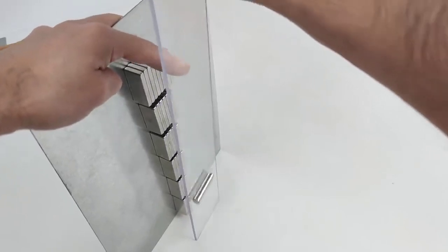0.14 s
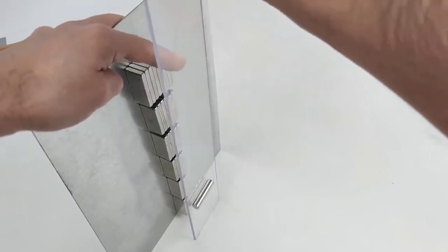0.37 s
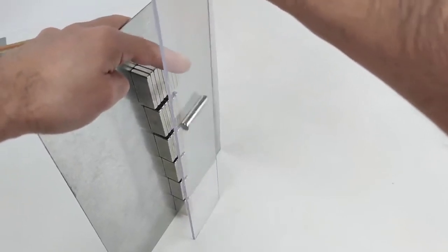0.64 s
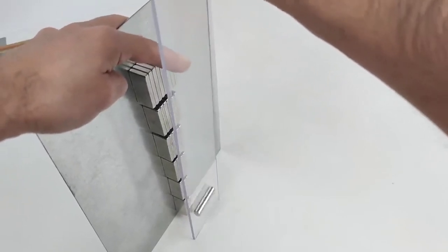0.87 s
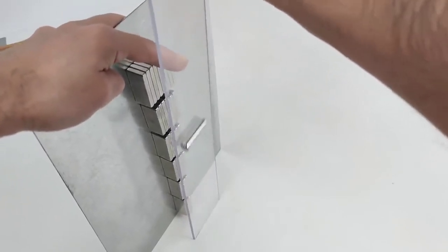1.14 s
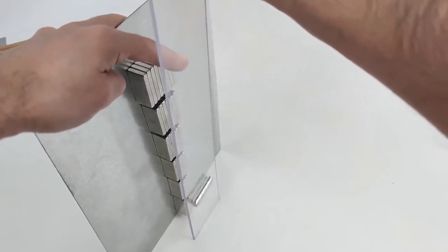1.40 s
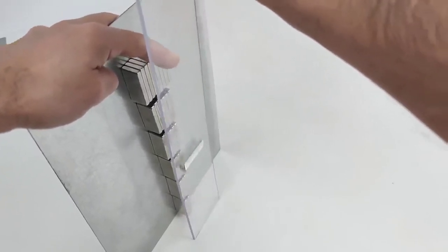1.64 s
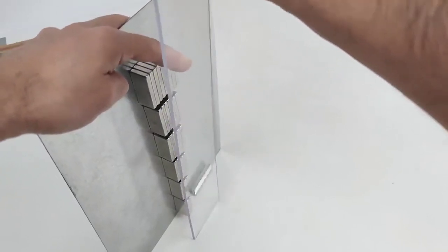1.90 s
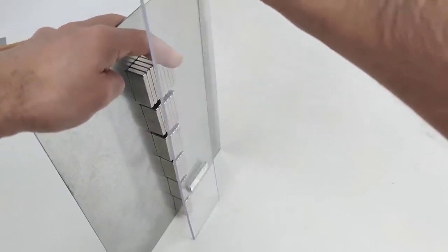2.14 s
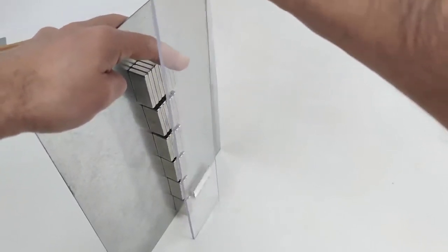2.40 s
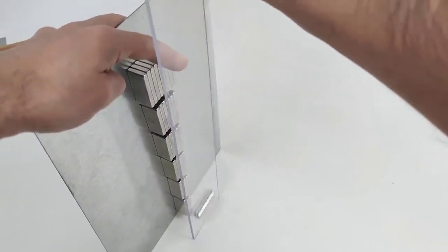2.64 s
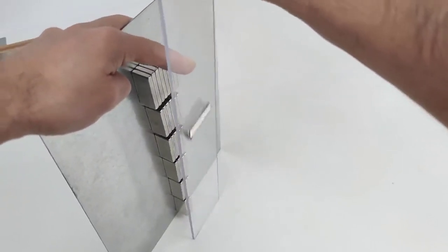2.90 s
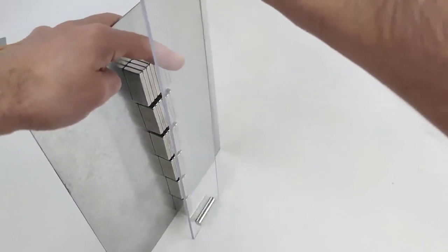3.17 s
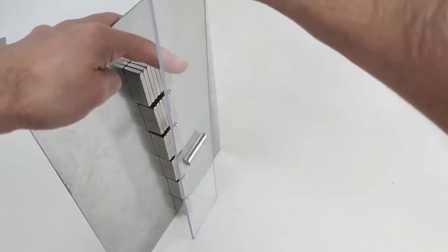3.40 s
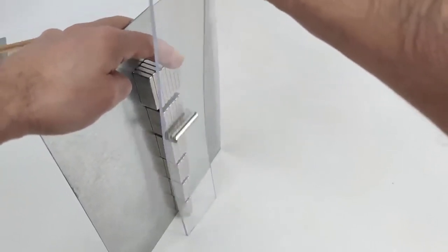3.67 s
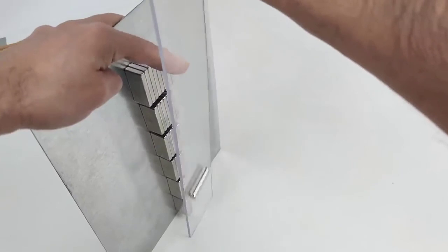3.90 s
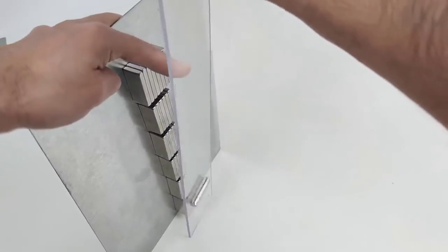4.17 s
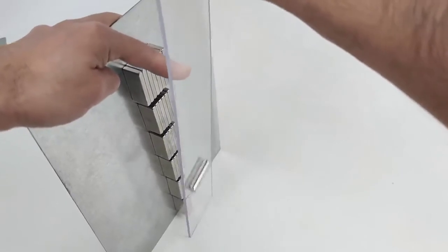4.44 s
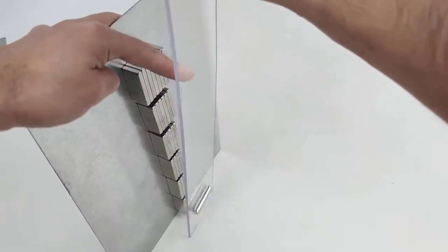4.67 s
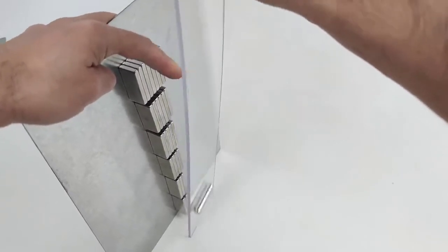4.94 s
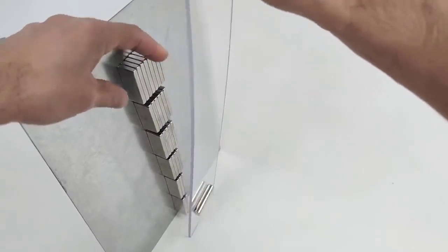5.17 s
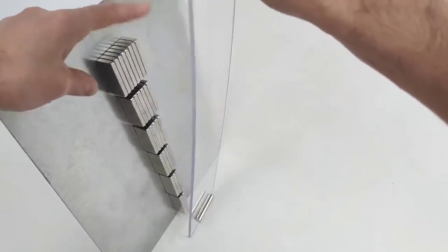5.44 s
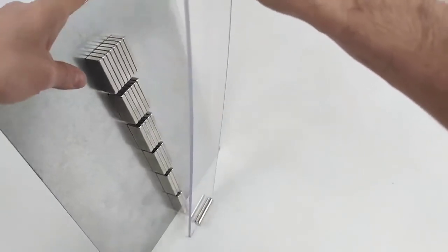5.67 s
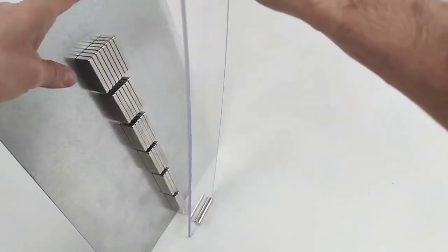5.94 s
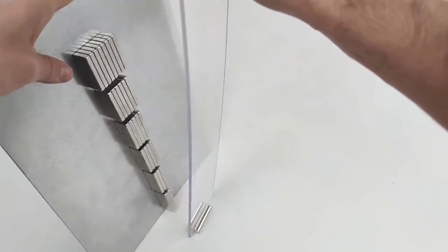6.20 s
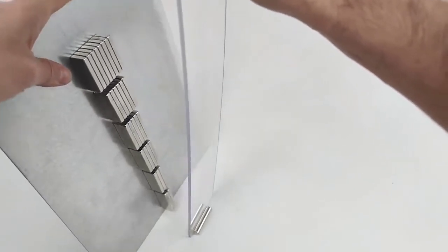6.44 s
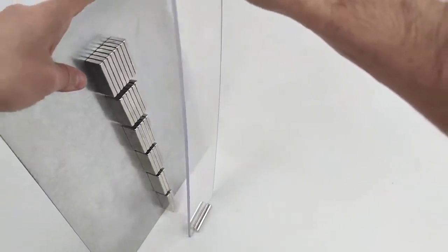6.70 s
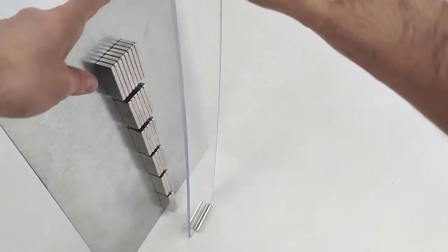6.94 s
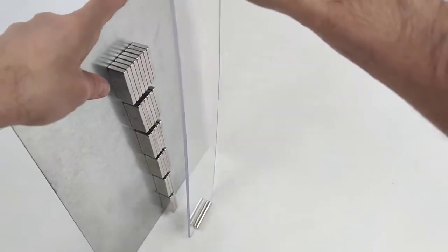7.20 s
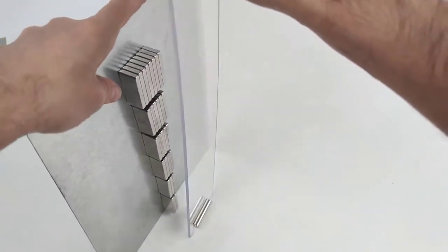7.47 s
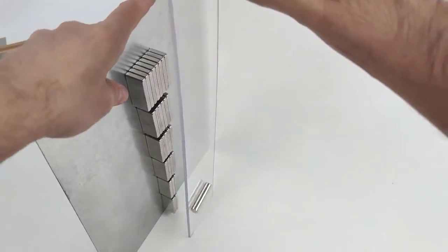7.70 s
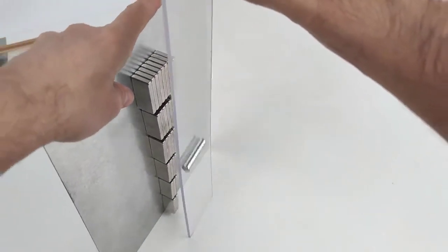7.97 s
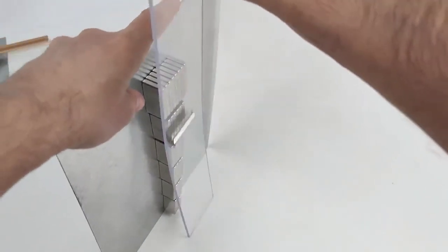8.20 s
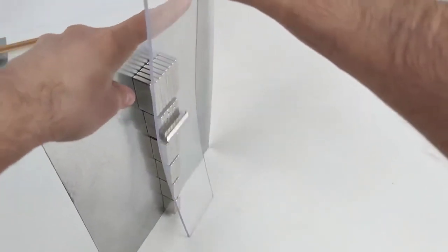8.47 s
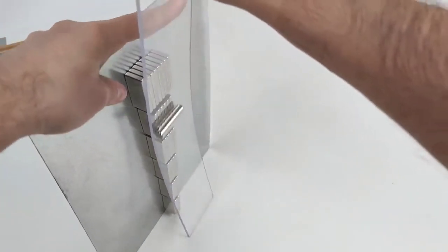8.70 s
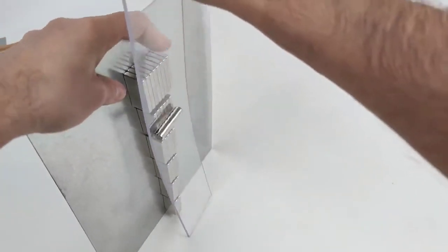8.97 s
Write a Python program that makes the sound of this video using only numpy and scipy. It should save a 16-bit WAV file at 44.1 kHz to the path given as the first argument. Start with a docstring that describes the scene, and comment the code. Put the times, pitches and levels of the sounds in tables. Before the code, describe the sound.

Close stereo in a quiet room with a short, soft tail and faint hiss and rumble. From 0 to 3.4 s a small steel cylinder rolls up and down thin plastic, about three or four rasping strokes a second, each swelling then dulling at the turn, grainy and bright around 2 kHz with a wavering ring and crisp clicks, densest and brightest around 2.2-3.1 s. At 3.6 s comes one very loud sharp crack with a low ring. Strokes resume 3.9-5.4 s with harder knocks; at 5.05 s a strong knock booms the steel plate. From 5.6 to 6.2 s weaker, duller scuffs and knocks end in a hollow low groan. It is nearly silent 6.5-7.5 s. Faint falling scrapes begin at 7.6 s, clicks gather around 8 s, a loud clack with low boom hits at 8.17 s, a thud follows at 8.27, then soft rapid fluttering, about 29 pulses a second, fades until 9.1 s.

```python
"""Steel cylinder rolling on a plastic sheet

A small steel cylinder, held by magnets on a steel plate, rolls up and down a clear plastic sheet.
Rolling sends tiny random contacts through the sheet's many modes, heard as rasping strokes.
Knocks are short trains of contacts that ring the sheet; the shaken plate booms in low modes.
At the end the cylinder rocks quickly in place. A quiet room is heard through two close microphone ports.
"""
import sys
import numpy as np
from scipy import signal
from scipy.fft import rfft, irfft, next_fast_len
from scipy.io import wavfile

SR = 44100
rng = np.random.default_rng(int(sys.argv[2]) if len(sys.argv) > 2 else 0)


def wav_out(sig):
    """Save sig, one row per channel (or a flat mono array), as 16-bit PCM at SR to the path in sys.argv[1]."""
    wavfile.write(sys.argv[1], SR, np.round(np.clip(np.atleast_2d(sig).T, -1, 1) * 32767).astype(np.int16))


def decibels_to_gain(level_db):
    """Convert a level in decibels to a linear amplitude gain (20 dB per decade)."""
    exponent = np.asarray(level_db, float) / 20
    return 10 ** exponent


N = 401310   # length in samples

# Levels and decay times in the tables are starting values; the functions add gains and damping.
# Pan is left minus right.

# rolling strokes up or down the sheet:
# (middle [s], length [s], rasp at full speed [dB], treble over rasp [dB])
STROKES = [(0.1, 0.39, -48.5, -8), (0.561, 0.27, -37.5, 1.5), (0.821, 0.29, -35.5, -2),
           (1.125, 0.26, -34, -4.5), (1.394, 0.25, -32, -3.5), (1.686, 0.24, -33.5, 0.5),
           (1.924, 0.3, -35.5, 1.5), (2.227, 0.28, -37, 7.5), (2.443, 0.34, -35.5, 6.5),
           (2.749, 0.27, -30.5, -4.5), (3.031, 0.3, -34, 3.5), (3.364, 0.31, -38.5, -1),
           (3.974, 0.34, -40, -0.5), (4.24, 0.27, -35.5, -6.5), (4.543, 0.33, -40.5, 6),
           (4.72, 0.2, -33.5, -2), (5.026, 0.28, -32.5, 2), (5.37, 0.21, -38.5, -2),
           (5.589, 0.085, -40, -21), (5.686, 0.19, -43, -26), (5.857, 0.12, -44, -26),
           (5.942, 0.15, -45, -31), (6.156, 0.19, -41.5, -2.5), (6.423, 0.032, -54, -23)]
TURN_DROP_DB, TURN_SHARPNESS = 19, 3.18   # the rasp sinks this far at both ends, where the cylinder turns
BITE_PER_DB, FIZZ_DB, FIZZ_PER_BITE = 2.66, -10, 1   # slower rolling is duller; top octave over rasp
STROKE_SHAKE_DB, SHAKE_PER_DB, STROKE_REGION_HZ = -56, 0.64, 896   # rolling shakes the plate a little

# hard knocks leave a dying rattle and shake the plate:
# (time [s], rattle [dB], shake [dB], region shaken [Hz], fade [dB per s])
JOLTS = [(0.0, -50, -57.5, 494, 167), (3.608, -42.5, -57.5, 650, 60), (4.629, -57, -41.5, 405, 200),
         (5.051, -41.5, -31.5, 840, 103.5), (5.392, -45.5, -43.5, 387, 116), (5.651, -62, -48, 380, 94),
         (5.907, -61.5, -54.5, 370, 42), (6.172, -49, -37, 460, 125), (8.167, -40.5, -50.5, 520, 111),
         (8.269, -42, -43.5, 470, 78)]
JOLT_BITE_DB, JOLT_RISE_S, JOLT_FIZZ_DB = 2, 0.0086, 5

# the cylinder creeps up the sheet, then rocks in place:
# (time [s], rasp [dB], treble over rasp [dB], shake [dB], region shaken [Hz])
CREEP = [(0, -68, -1, -67.5, 450), (6.3, -90, -10.5, -65.5, 414.7), (6.62, -77.5, -8, -74, 289.7),
         (7.5, -79, -9, -78.5, 303), (7.6, -59.5, -32.5, -63, 445), (7.8, -55, -21, -62.5, 480),
         (7.84, -59, -17, -67, 398), (8.08, -40, -8.5, -60, 596), (8.3, -58, 3.5, -75, 500),
         (8.5, -47.5, -29, -58, 400), (8.7, -46, -12, -51, 643), (8.87, -57, 0.5, -55, 504),
         (8.96, -66.5, 11, -55.5, 600), (9.07, -68, 7.5, -51.5, 360), (9.1, -73, 1, -70, 356)]
TICKS_PER_S, TICK_DB = 60, 10.0   # many small random ticks stand out of the rasp
SOFT_TOP = 13   # contacts are clipped at this height below the treble

# how strongly the sheet sounds: (frequency [Hz], level [dB per Hz])
SHEET = [(290, -46.5), (500, -36.5), (1070, -16.5), (1410, 1.5), (1890, 0), (2460, -1), (2690, 1.5),
         (3500, -9), (3930, -2.5), (5430, -4.5), (7490, -1.5), (8930, -13.5), (14700, -17), (16500, -27.5)]
# how long the sheet rings before damping: (frequency [Hz], fall by 60 dB [s])
SHEET_T60 = [(700, 0.12), (2000, 0.16), (6000, 0.07), (14000, 0.13)]
# sheet resonances that stand out: (frequency [Hz], width [Hz], level [dB])
SHEET_MODES = [(1930, 54, 0), (2610, 100, -1), (4140, 110, -5), (5250, 27, -5), (6800, 260, -4)]
# likeness of mode phases left and right: (frequency [Hz], likeness [0-1])
SHEET_ALIKE = [(700, 0.23), (2000, 0.79), (6000, 0.61), (12000, 0.1)]

# ring of wavering pitch under the strokes: (time [s], pitch [Hz])
WAVER = [(0.4, 1890), (1.07, 1933), (1.28, 1750), (1.35, 2180), (1.56, 1623), (1.63, 2113), (1.8, 1770),
         (1.87, 2155), (2.19, 2060), (2.31, 1764), (2.5, 2080), (2.67, 1744), (2.78, 2287), (3.25, 1733),
         (3.29, 2310), (3.53, 1710), (3.55, 2090), (3.73, 2340), (3.82, 1860), (4.01, 2150), (4.04, 1770),
         (4.33, 2147), (4.9, 1740), (4.96, 2340), (5.09, 1815), (5.2, 1850)]
WAVER_DB, WAVER_WIDTH_HZ = -11.5, 230   # level is over the rasp
# short slides of the creeping cylinder, each a falling ring:
# (start [s], length [s], from [Hz], to [Hz], level [dB])
SLIDES = [(7.58, .09, 2145, 1337, -57.5), (7.696, 0.12, 2770, 1710, -53.5), (7.854, 0.059, 2720, 2400, -58),
          (7.923, 0.063, 2290, 1910, -59)]
SLIDE_WIDTH_HZ = 530
# once the sheet is bent away from the magnets one resonance stands out; level is over the rasp
BENT_S, UNBENT_S, BENT_HZ, BENT_DB = 4.9, 6.5, 1450, -10

# knocks on the sheet:
# (time [s], peak [dB], middle over peak [dB], boom over peak [dB], pan [dB])
KNOCKS = [(0.013, -24.5, -16, -43, -3), (0.0948, -31, -4, -41, -5), (0.182, -32, -3, -40, 0),
          (0.3377, -38.5, -9, -32, 1), (0.452, -39.5, 4, -12, 3), (0.487, -24.5, -6.5, -43, 4),
          (0.5328, -25, -2, -34, 2), (0.7872, -20, -3, -41, 1), (0.8602, -17.5, -12, -49, -1),
          (0.914, -20, -11, -24, -1), (1.029, -31, -1, -31, 1), (1.0817, -24, -22, -38, -5),
          (1.3663, -32, 2, -37, 4.5), (1.4351, -19.5, -8, -36, -5), (1.4928, -26.5, -22, -15, -9),
          (1.5769, -35, 4.5, -10, -1), (1.6315, -25, -30, -27, -20), (1.837, -35.5, -8, -37, 9),
          (1.97, -22, -10, -27, -10), (2.136, -22, -6, -27, -1.5), (2.1795, -22, -4, -25, 2),
          (2.4618, -19, -17.5, -40, 0), (2.476, -25, -22, -38, 1), (2.529, -19.5, -6, -20, 2),
          (2.673, -29.5, 6.5, -29, -2), (2.708, -22, -5, -40, 3), (2.7242, -16, -8, -41, -3),
          (3.0258, -14.5, -13.5, -37, -1), (3.2257, -34, -7, -22, -5), (3.302, -26.5, -15, -35.5, -9),
          (3.3496, -22.5, -8.5, -40.5, 4.5), (3.609, -1, -18, -19.5, 2.5), (3.8686, -22.5, -12, -44, 3),
          (3.959, -33, -5, -33, 0), (4.0028, -25.5, -7, -40, 5), (4.0508, -21.5, -10, -21, -8),
          (4.163, -23, -5, -29, -4), (4.2103, -21.5, -6, -41, -3), (4.2541, -16, -13.5, -40, 0),
          (4.471, -40, 1, -32, 11), (4.5284, -20, -1.5, -49, 7), (4.5788, -13, -18, -31, 7.5),
          (4.632, -11.5, -15.5, -28, 0.5), (4.6962, -17, -16, -23, 2.5), (4.7509, -23.5, -2.5, -34, 6.5),
          (4.7771, -29, -7, -30, 5.5), (4.951, -34.5, -9, -37, 0), (4.974, -15.5, -13.5, -42.5, 5),
          (5.0211, -10, -16.5, -27.5, 3), (5.052, -14.5, 3, -9, -1), (5.0641, -3.5, -21.5, -38.5, 1),
          (5.334, -28, 0.5, -16, 5.5), (5.393, -10.5, -15, -18.5, 1.5), (5.4894, -29.5, -6.5, -36, 2),
          (5.569, -34, 0, -28, 7), (5.652, -18, -11, -18, -1), (5.8107, -34, -2.5, -24, 2),
          (5.9061, -19.5, -11, -15, 0), (6.1728, -16.5, -8, -10, 4), (6.1843, -11, -18.5, -27, -2),
          (7.598, -46, 0, -25, -2), (7.798, -44, 3.5, -27, 4.5), (7.9113, -39, 2.5, -13, 2),
          (7.999, -25.5, -6, -35, 1), (8.0669, -23.5, -7.5, -40, 4), (8.13, -22, -5, -22, 3),
          (8.168, -3.5, -14, -18, -8), (8.2727, -21, -6, -5, -5)]
# further knocks, most of them during strokes, with a common middle and boom: (time [s], peak [dB], pan [dB])
MORE_KNOCKS = [(0.7489, -36, 0.5), (0.8837, -29, 6), (1.0578, -32, -2), (1.1215, -35, -2),
               (1.169, -33, -3), (1.4428, -26, 0), (1.4622, -36, -2), (1.607, -30, 0), (1.6677, -27, -2),
               (1.9334, -21, 0), (1.9529, -34, 3), (1.9939, -39, 2), (2.0181, -21, -1), (2.1567, -27.5, 2),
               (2.2076, -14.5, 0), (2.2524, -12.5, 1), (2.3566, -29, -1.0), (2.412, -13, 1),
               (2.4357, -20, -4), (2.6462, -32.5, -8), (2.933, -43, -3), (2.739, -20, 0), (2.7643, -23, 0),
               (2.791, -23, 4), (3.001, -37, 0), (3.055, -22, -2), (3.073, -23, -9), (3.0897, -24, -9),
               (3.146, -30, -2), (3.238, -36, 9), (3.2717, -49, -1.5), (3.325, -27, -8), (3.507, -38, -2),
               (3.9828, -24, -3), (4.087, -43, 0), (4.512, -33, -3), (4.5455, -19, 0), (4.603, -24, 0),
               (4.735, -22, 0), (5.0318, -28, 0), (5.0572, -14, 2.5), (5.6132, -38, 0), (5.8382, -38.5, 3),
               (5.844, -40, 0), (6.426, -53, 0), (7.926, -45, 2), (8.0053, -47, 0), (8.0741, -36, 0)]
MORE_MID_DB, MORE_BOOM_DB = -12.5, -39.5   # over their peak
BOUNCE_LOSS_DB, GRAZE_LOSS_DB = 2, 12   # least loss of a bounce; further loss of a graze
SNAP_HZ, SNAP_T60_S, SNAP_DB = 7630, 0.0069, -6   # the steel cylinder's own short ping at each knock

# swings of the rocking cylinder:
# (time [s], peak [dB], resonance woken most [Hz], low body over peak [dB])
SWINGS = [(8.4075, -42, 1760, -8.5), (8.443, -39, 1820, -19), (8.4801, -42, 2160, -24),
          (8.518, -35, 1363, -18), (8.553, -37.5, 1740, -19), (8.5929, -49, 2200, -4),
          (8.6232, -42, 2210, -12), (8.657, -37, 1750, -17), (8.6908, -49.5, 1750, -4.5),
          (8.726, -48, 1780, -9), (8.7591, -40.5, 1860, -9), (8.795, -51, 1730, 0),
          (8.8273, -44, 1720, -17), (8.8609, -43, 1650, -11), (8.8944, -56, 1400, 4.5),
          (8.9252, -45, 1740, -8), (8.9587, -47, 1735, -14), (8.9937, -48, 1740, -12),
          (9.026, -51, 1450, 1), (9.0606, -68, 1740, 4)]
# sheet pressed by the cylinder: (frequency [Hz], level [dB], fall by 60 dB [s])
ROCK_MODES = [(1430, -17, 0.043), (1685, -15, 0.074), (1795, -2.5, 0.032), (2180, -3, 0.041),
              (2690, -4, .05), (3110, 5.5, 0.051)]
# its low modes: (frequency [Hz], level [dB], fall by 60 dB [s])
ROCK_BODY = [(480, -4.5, 0.18), (685, -7.5, 0.095), (777, 0, 0.073), (1000, -5.5, 0.054),
             (1230, -19, 0.049)]
ROCK_S, ROCK_HZ, ROCK_DB = 8.486, 28.8, 3.5   # time of a swing peak, swing rate, depth up and down
LEAN_S = 0.018   # a swing presses this long

# steel plate modes: (frequency [Hz], level [dB], fall by 60 dB [s])
PLATE = [(250, -8, .12), (335, -2, .15), (376, -4, .1), (462, -8, .12), (570, -12, .2), (650, -8, .12),
         (754, -5, .2), (890, -4, .25), (955, -6, .25), (1100, -3, .2), (1217, 0, .22), (1427, -5, .2)]
# Long plate modes sing on their own when the plate slides or is hit hard.
# middle mode: (loudest [s], level [dB], rise [s], fade [dB per s])
GROAN, GROAN_HZ = [(6.046, -52, 0.029, 220), (6.155, -42, 0.074, 300), (6.205, -41, 0.066, 200),
                   (6.275, -57, 0.04, 250), (8.174, -37, 0.012, 260), (8.325, -47, 0.11, 121)], 516
# deepest mode: (loudest [s], level [dB], rise [s], fade [dB per s])
DEEP, DEEP_HZ = [(3.616, -45.5, .008, 92.4), (5.056, -48, 0.0037, 171), (8.174, -41.5, 0.0052, 350),
                 (8.436, -48, 0.03, 600)], 172.5
# booming mode: (loudest [s], level [dB], rise [s], fade [dB per s])
BOOM, BOOM_HZ = [(4.632, -51, 0.014, 300), (5.056, -34.5, 0.008, 300), (5.396, -59, .006, 97.7),
                 (5.656, -53, 0.0099, 251.3), (5.911, -47.5, 0.012, 300), (6.172, -38.5, 0.025, 330),
                 (8.882, -58, 0.027, 400), (9.078, -50, 0.11, 99)], 370
ROLL_HUM_DB = -9.5   # rolling keeps the booming mode humming, over the shake level
# chiming mode: (loudest [s], level [dB], rise [s], fade [dB per s])
CHIME, CHIME_HZ = [(3.63, -61.5, 0.017, 197.5), (3.715, -58, .05, 61.1)], 567
# higher ring at the knocks near 6.2 s: (loudest [s], level [dB], rise [s], fade [dB per s])
HIGH_RING, HIGH_RING_HZ = [(6.19, -44, 0.022, 200)], 1520

LEFT_LAG = 4   # samples the left port hears later
ROOM_T60_S, ROOM_DB, WALL_HZ = 0.49, -12, 4974
# steady noise of room and microphone, used above 110 Hz: (frequency [Hz], level [dB per Hz])
HUSH, HUSH_DB = [(15, -30), (25, 0), (48, -17), (78, -11), (105, -24), (208, -26), (266, -32.5),
                 (1150, -41.5), (9850, -52.5), (15200, -48.5), (16500, -57)], -68.5
# lumpy low rumble on the ports: (time [s], level [dB])
RUMBLE = [(0.0, -60.5), (1.9, -61), (2.7, -61.5), (3.8, -60.5), (4.9, -61), (5.1, -54), (5.4, -58.5),
          (6.1, -61), (6.33, -54.5), (6.66, -61.5), (7.86, -61.5), (8.03, -60), (8.36, -52), (8.62, -62.5),
          (9.1, -58)]
RUMBLE_SHARED = 0.7   # gain of the noise that both ports hear, beside their own
TOP_HZ = 16700


def rms_one(x):
    """Scales a sound to rms 1."""
    return x / np.sqrt(np.mean(x ** 2) + 1e-20)


def in_time(rows):
    """Draws straight lines between table rows, one curve per column after the time."""
    s, *columns = np.transpose(rows)
    return [np.interp(np.arange(N) / SR, s, c) for c in columns]


def at_hz(points, hz):
    """Reads a table between its frequencies, on a log scale."""
    table_hz, value = np.array(points).T
    return np.interp(np.log(hz + 1), np.log(table_hz), value)


def butter(x, hz, kind, order=2):
    """Filters with a smooth low, high or band pass."""
    return signal.sosfilt(signal.butter(order, hz, kind, fs=SR, output="sos"), x)


def through(x, response):
    """Lets every sample of x start the response."""
    return signal.fftconvolve(np.atleast_2d(x), response, axes=-1)[:, :N]


def resonate(drive, hz, t60):
    """One mode: a two-pole resonator that falls by 60 dB in t60 seconds."""
    r, w = decibels_to_gain(-60 / (t60 * SR)), 2 * np.pi * hz / SR
    return signal.lfilter([0, np.sin(w)], [1, -2 * r * np.cos(w), r * r], drive + 1e-18)


def drift(rate):
    """Slow random wander of rms 1, from noise low-passed near rate (Hz)."""
    r = np.exp(-80 * np.pi * rate / SR)   # one step every 40 samples
    slow = signal.lfilter([1], [1, -2 * r, r * r], rng.standard_normal(N // 40 + 2002))[2000:]
    return np.interp(np.arange(N) / 40, np.arange(len(slow)), rms_one(slow))


def rise_fade(s, rise_s, fade_db_s):
    """Gain that swells up to 1 at s and then dies away evenly in dB."""
    t = np.arange(N) / SR - s
    return np.clip(t / rise_s + 1, 0, 1) ** 2 * decibels_to_gain(-fade_db_s * np.maximum(t, 0))


def motion():
    """Strokes, jolts and creep add up in power to rasp, bite, fizz, shake (dB) and region shaken (Hz)."""
    t, total = np.arange(N) / SR, np.full((5, N), 1e-18)

    def add(span, rasp_gain, bite_db, shake, region_hz, sharp_db=0):
        """Adds the power of one movement; the last row weighs the region by the shake."""
        fizz_db = sharp_db + FIZZ_DB + FIZZ_PER_BITE * bite_db
        parts = (rasp_gain, rasp_gain * decibels_to_gain(bite_db), rasp_gain * decibels_to_gain(fizz_db),
                 shake, shake * np.sqrt(region_hz))
        for row, part in zip(total, parts):
            row[span] += part ** 2

    for middle, length, db, bite_db in STROKES:
        span = np.abs(t - middle) < length
        drop_db = -TURN_DROP_DB * np.abs(2 * (t[span] - middle) / length) ** TURN_SHARPNESS
        shake_db = STROKE_SHAKE_DB + SHAKE_PER_DB * (db + 31.5 + drop_db)
        add(span, decibels_to_gain(db + drop_db), bite_db + BITE_PER_DB * drop_db, decibels_to_gain(shake_db), STROKE_REGION_HZ)
    for s, db, shake_db, region_hz, fade in JOLTS:
        dying = rise_fade(s + JOLT_RISE_S, JOLT_RISE_S, fade)
        add(slice(N), decibels_to_gain(db) * dying, JOLT_BITE_DB, decibels_to_gain(shake_db) * dying, region_hz, JOLT_FIZZ_DB)
    db, bite_db, shake_db, region_hz = in_time(CREEP)
    add(slice(N), decibels_to_gain(db), bite_db, decibels_to_gain(shake_db), region_hz)
    low, hard, fine, shake = 10 * np.log10(total[:4])
    return low, hard - low, fine - low, shake, total[4] / total[3]


def grit(per_s=2600., spread_db=2.0):
    """Tiny uneven contacts of the rolling steel, coming in clumps; many small random ticks stand out."""
    born = rng.random(N) < per_s * decibels_to_gain(4.0 * drift(40)) / SR
    fine = born * decibels_to_gain(spread_db * np.minimum(rng.exponential(1, N), 4.2))
    ticks = (rng.random(N) < TICKS_PER_S / SR) * decibels_to_gain(TICK_DB + rng.normal(0, 2.5, N))
    return rms_one((fine + ticks) * rng.choice([-1, 1], N))


def rocking():
    """Gain that swells with every swing once the cylinder rocks in place."""
    t = np.arange(N) / SR - ROCK_S
    swing = np.cos(2 * np.pi * ROCK_HZ * t + .25 * drift(6))
    return decibels_to_gain(ROCK_DB * swing * np.clip(t / .1 + 1, 0, 1))


def modes(hz, db, t60, alike, length_s, together=.5):
    """Stereo ring of decaying sines, energy 1; each port hears every mode with a partly own phase."""
    t = np.arange(int(length_s * SR)) / SR
    turn = rng.normal(0, 1, (2, len(hz), 1)) * (1 - np.clip(alike, 0, 1)) * np.pi
    # modes that start in step give a sharp front
    sign = np.where(rng.random((len(hz), 1)) < together, 1, -1)
    shape = sign * decibels_to_gain(db)[:, None] * decibels_to_gain(-60 * t / t60[:, None])
    ring = np.array([np.sum(shape * np.cos(2 * np.pi * hz[:, None] * t + side), axis=0) for side in turn])
    return ring / np.sqrt(np.sum(ring ** 2) / 2)


def sheet_ring(stand_out_db=-1.5, damping=1.0, together=.5):
    """Ring of one struck spot: dense modes, evenly spread as in any plate, and the strong resonances."""
    strong = np.array(SHEET_MODES)
    dense = np.linspace(520, 16500, 300) + rng.uniform(-50, 50, 300)
    hz = np.r_[dense, strong[:, 0]]
    t60 = np.r_[at_hz(SHEET_T60, dense), 2.2 / strong[:, 1]] / damping   # narrow modes ring longer
    # shorter modes start stronger
    db = at_hz(SHEET, hz) - 10 * np.log10(t60) + rng.normal(0, 4, len(hz))
    db[len(dense):] += stand_out_db
    ring = modes(hz, db, t60, at_hz(SHEET_ALIKE, hz)[:, None], length_s=0.05, together=together)
    return butter(ring, 800, "high", order=4)   # keeps the sheet's ring above 800 Hz


def rasp(rasp_db, bite_db, fizz_db, spots=9):
    """Rolling contacts ring several spots of the sheet in drifting shares; firmer rolling bites brighter."""
    contacts = grit() * decibels_to_gain(0.51 * drift(10))
    share = np.array([decibels_to_gain(14.0 * drift(18)) for k in range(spots)])
    share /= np.sqrt(np.sum(share ** 2, axis=0))
    spot, swell = rng.integers(0, spots, N), rocking()
    soft = butter(np.clip(contacts, -SOFT_TOP, SOFT_TOP), 3400, "low", order=4)
    hard = butter(contacts, [3400, 8600], "band", order=4) * decibels_to_gain(bite_db + 1.0 * drift(17))
    fine = butter(contacts, 10000, "high", order=4) * decibels_to_gain(fizz_db + 5.5 + 0.83 * drift(56))
    # the hiss swells less than the rest
    push = decibels_to_gain(rasp_db + 14.0) * (swell * soft + np.sqrt(swell) * (hard + fine))
    return sum(through(push * share[k] * (spot == k), sheet_ring(damping=1.38)) for k in range(spots))


def gliding(hz, width_hz, ports_rad=.8):
    """Grit through one resonance of moving pitch; rms 1."""
    phase = 2 * np.pi * np.cumsum(hz) / SR + np.array([[0], [ports_rad]])
    even, odd = (butter(grit(), width_hz / 2, "low") for k in range(2))
    return rms_one(even * np.cos(phase) + odd * np.sin(phase))


def wavering_ring(rasp_db):
    """The ring's pitch wavers irregularly during the strokes and falls through each slide."""
    t = np.arange(N) / SR
    hz, gain = np.zeros(N), np.zeros(N)
    for s, length, from_hz, to_hz, db in SLIDES:
        way = np.clip((t - s) / length, 0, 1)
        hz = np.where(t >= s, from_hz + (to_hz - from_hz) * way, hz)
        gain = np.where(t >= s, decibels_to_gain(db) * np.sqrt(np.sin(np.pi * way) + 1e-12), gain)
    rolling_gain = decibels_to_gain(rasp_db + WAVER_DB) * (t < UNBENT_S)
    rolling = rolling_gain * gliding(in_time(WAVER)[0], WAVER_WIDTH_HZ)
    return rolling + gain * gliding(hz, SLIDE_WIDTH_HZ)


def contacts_table():
    """All knocks from both tables together, in the columns of the first."""
    return np.array(KNOCKS + [(s, db, MORE_MID_DB, MORE_BOOM_DB, pan) for s, db, pan in MORE_KNOCKS])


def blows(level_db, fade_db_s, bounce_s=.002, count=5):
    """Each knock is a graze, a main contact and bounces that die sooner after light knocks, panned."""
    s, peak_db, pan = contacts_table()[:, [0, 1, 4]].T
    luck, train = rng.random((len(s), 2 * count)), np.zeros((2, N + SR))
    late = np.c_[0 * s, np.cumsum(bounce_s * (.2 + luck[:, 1:count]), axis=1)]
    late[:, 1] *= -1   # one end of the cylinder grazes just before
    fade = fade_db_s * decibels_to_gain(-.5 * (peak_db + 18.5))[:, None]
    weaker_db = (BOUNCE_LOSS_DB + 8 * luck[:, count:]) * (late != 0) + GRAZE_LOSS_DB * (late < 0)
    size = decibels_to_gain(level_db[:, None] - fade * np.abs(late) - weaker_db)
    place = np.round((s[:, None] + late) * SR).astype(int)
    for side, sign in enumerate((1, -1)):
        np.add.at(train[side], place, size * decibels_to_gain(sign * pan / 2)[:, None])
    return train[:, :N]


def knocks(gain_db=13.0, crack_db=-18.5, crack_per_db=0.48, click_db=7.5, spots=4):
    """The cylinder knocks on the sheet: a thin crack, a click and a ping, and a short ring of the spot hit."""
    s, peak_db, mid_db = contacts_table().T[:3]
    spot, ring = rng.integers(0, spots, len(s)), 0
    for k in range(spots):
        level_db = np.where(spot == k, peak_db, -200)   # mutes the other spots
        dull = butter(blows(level_db + mid_db + 6.0, 810), 3100, "low", order=4)
        sharp = butter(blows(level_db, 1000), 3400, "high", order=4)
        ring = ring + through(dull + sharp, sheet_ring(damping=3.6, together=.8))
    t = np.arange(round(.016 * SR)) / SR
    splinter = butter(rng.standard_normal((1, len(t))) * decibels_to_gain(-60 * t / .014), [8500, 16500], "band")
    crack = through(blows(peak_db + crack_db + crack_per_db * (peak_db + 20), 1200), splinter)
    ping = resonate(blows(peak_db + SNAP_DB, 1500), SNAP_HZ, SNAP_T60_S)
    click = butter(blows(peak_db + click_db, 1500), [1600, 8500], "band")   # the contact heard directly
    return decibels_to_gain(gain_db) * ring + crack + ping + click


def swings(gain_db=-19.0, low_db=-21.0, narrow_db=22.0):
    """Each swing of the rocking cylinder scuffs the sheet; modes near the pressed spot's pitch answer most."""
    s, peak_db, woken_hz, body_db = np.transpose(SWINGS)
    size = round(LEAN_S * SR)
    scuff = rng.standard_normal((len(s), size)) * np.hanning(size)
    place = np.round(s * SR).astype(int)[:, None] + np.arange(size) - size // 4
    all_modes = ROCK_MODES + ROCK_BODY
    luck, out = rng.normal(0, 2, (len(s), len(all_modes))), 0
    for k, (hz, db, t60) in enumerate(all_modes):
        if k < len(ROCK_MODES):
            near_db = gain_db - narrow_db * np.abs(np.log2(hz / woken_hz))
        else:
            near_db = low_db + body_db
        drive = np.zeros(N + SR)
        drive[place] += scuff * decibels_to_gain(peak_db + db + near_db + luck[:, k])[:, None]
        out = out + resonate(drive, hz, t60)
    return out[:N]


def plate(shake_db, region_hz, gain_db=-12.5, narrow_db=19.5):
    """The steel plate rings low when shaken or struck; modes near the excited region answer most."""
    s, peak_db, mid_db, boom_db, pan = contacts_table().T
    boom_hz = region_hz[np.round((s + .04) * SR).astype(int)]   # region just after each knock
    shake = decibels_to_gain(shake_db + 2.0 * drift(26.0)) * rocking() * rng.standard_normal((3, N))
    # broad buzz, alike in both ports; its upper part differs
    out = decibels_to_gain(3.0) * butter(shake[0], [150, 520], "band") * np.ones((2, 1))
    out += decibels_to_gain(9.5) * butter(shake[1:], [520, 1300], "band")
    out += butter(blows(peak_db + boom_db + 4.5, 500), [120, 1300], "band")   # dull thud of each knock
    for hz, db, t60 in PLATE:
        struck_db = db - narrow_db * np.abs(np.log2(hz / boom_hz)) + rng.normal(0, 4, len(s))
        drive = blows(peak_db + boom_db + struck_db + gain_db, 330)
        drive += shake[0] * decibels_to_gain(db - 33.5 - narrow_db * np.abs(np.log2(hz / region_hz)))
        drive[1] *= rng.choice([-1, 1]) if hz > 600 else 1   # high modes face the ports differently
        out += resonate(drive, hz, t60)
    return out


def singing(events, hz, width_hz, hum=0, steady=0.39):
    """One mode, part clear tone and part narrowed noise, swells and dies with each event, over a hum."""
    band = [hz - width_hz / 2, hz + width_hz / 2]
    noise = rms_one(butter(rng.standard_normal(N), band, "band", order=1))
    phase = 2 * np.pi * np.cumsum(hz + width_hz / 4 * drift(7.4)) / SR
    tone = rms_one(noise + steady * np.sin(phase))
    return hum * noise + tone * sum(decibels_to_gain(db) * rise_fade(s, rise_s, fade) for s, db, rise_s, fade in events)


def room(x):
    """Diffuse tail, unrelated in the two ports, duller than the direct sound."""
    t = np.arange(int(.5 * SR)) / SR
    tail = rng.standard_normal((2, len(t))) * decibels_to_gain(-60 * t / ROOM_T60_S) * np.clip(t / 0.0013, 0, 1)
    tail = butter(tail, WALL_HZ, "low", order=1)
    return decibels_to_gain(ROOM_DB) * through(x.mean(axis=0), tail / np.sqrt(np.sum(tail ** 2) / 2))


def hush():
    """Steady floor of coloured noise, own in each port."""
    size = next_fast_len(N)
    hz = np.arange(size // 2 + 1) * SR / size
    colour = decibels_to_gain(at_hz(HUSH, hz)) * (hz > 110)
    return decibels_to_gain(HUSH_DB) * rms_one(irfft(rfft(rng.standard_normal((2, size))) * colour, size)[:, :N])


def rumble():
    """Lumpy low noise, partly own in each port and stronger on the right."""
    lumps = decibels_to_gain(1.2 * drift(1.8) + np.array([2.2 * drift(6), 2.2 * drift(6)]))
    white = rng.standard_normal((3, N))
    low = butter(white[:2] + RUMBLE_SHARED * white[2], 25, "low", order=1)
    low = butter(low, [14, 110], "band")
    return decibels_to_gain(in_time(RUMBLE)[0] - 0.5) * rms_one(low * lumps) * decibels_to_gain([[-1.2], [1.2]])


def scene():
    """Cylinder, sheet and plate close by, in the room, over the floor."""
    rasp_db, bite_db, fizz_db, shake_db, region_hz = motion()
    near = rasp(rasp_db, bite_db, fizz_db) + wavering_ring(rasp_db)
    near += knocks() + swings() + plate(shake_db, region_hz)
    boom_hum = decibels_to_gain(np.minimum(shake_db, -58) + ROLL_HUM_DB)
    near += singing(GROAN, GROAN_HZ, width_hz=26.5, steady=0.93)
    near += singing(BOOM, BOOM_HZ, width_hz=42, hum=boom_hum)
    near += singing(DEEP, DEEP_HZ, width_hz=12)
    near += singing(CHIME, CHIME_HZ, width_hz=20)
    near += singing(HIGH_RING, HIGH_RING_HZ, width_hz=41)
    bent_times = [BENT_S, BENT_S + 0.27, UNBENT_S, UNBENT_S + .3]
    bent = np.interp(np.arange(N) / SR, bent_times, [0, 1, 1, 0])
    near += singing([], BENT_HZ, width_hz=40, hum=bent * decibels_to_gain(rasp_db + BENT_DB))
    near[0] = np.r_[np.zeros(LEFT_LAG), near[0, :-LEFT_LAG]]
    return near + room(near) + hush() + rumble()


def band_limit(x):
    """A steep low-pass at the top of the band."""
    return signal.sosfilt(signal.butter(12, 16980, fs=SR, output="sos"), x)


def record(dry):
    """Peaks are rounded softly and the top is cut."""
    top = .88
    rounded = top * np.tanh(dry / top)
    cut = signal.sosfilt(signal.cheby2(14, 50, TOP_HZ, fs=SR, output="sos"), rounded)
    return band_limit(cut)


dry = scene()
out = record(dry)
wav_out(out)
```